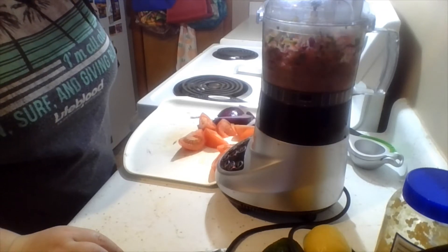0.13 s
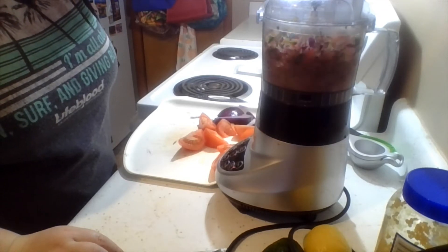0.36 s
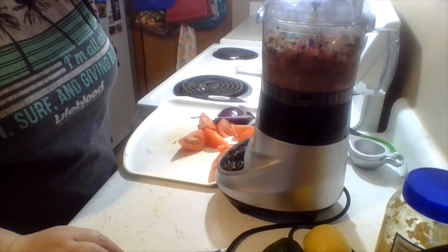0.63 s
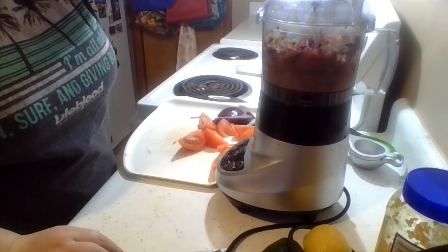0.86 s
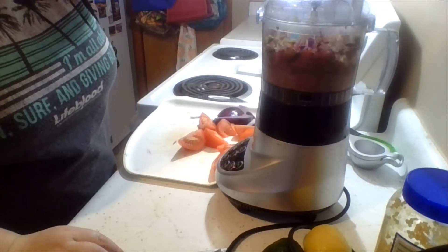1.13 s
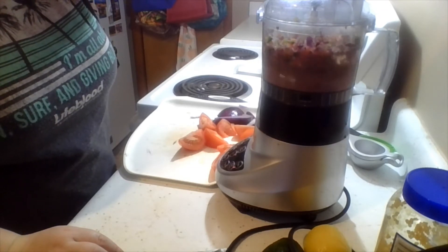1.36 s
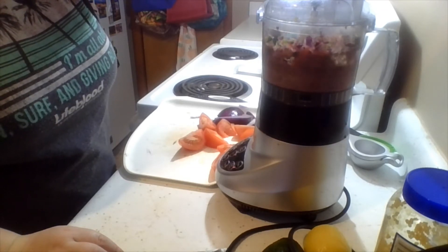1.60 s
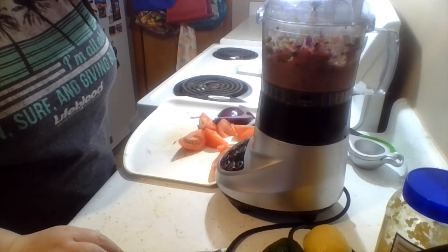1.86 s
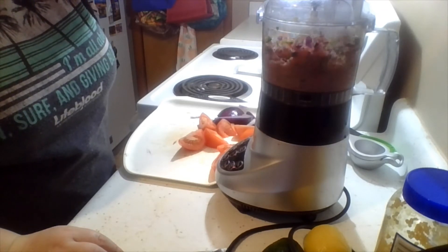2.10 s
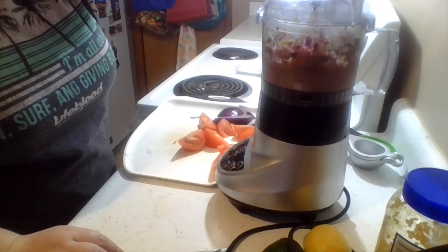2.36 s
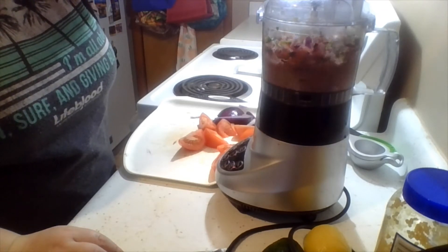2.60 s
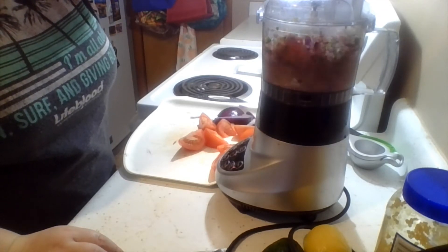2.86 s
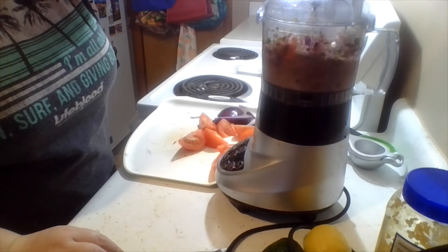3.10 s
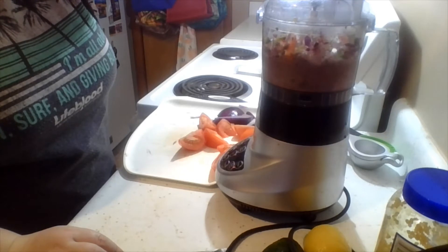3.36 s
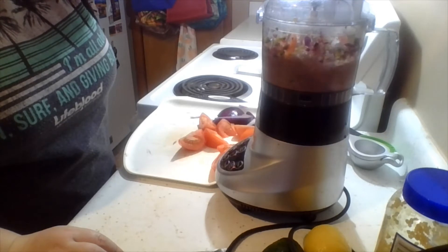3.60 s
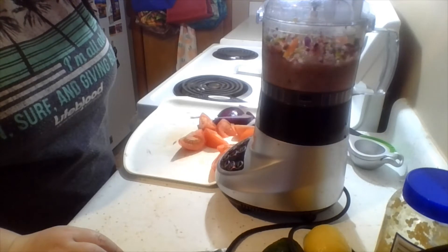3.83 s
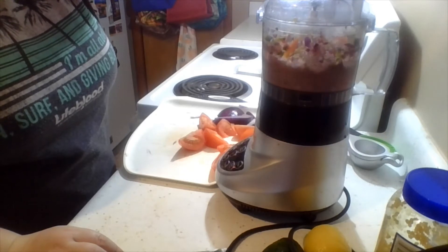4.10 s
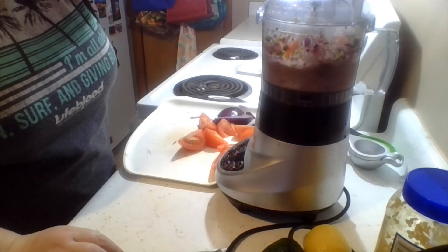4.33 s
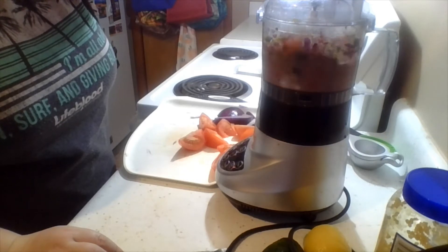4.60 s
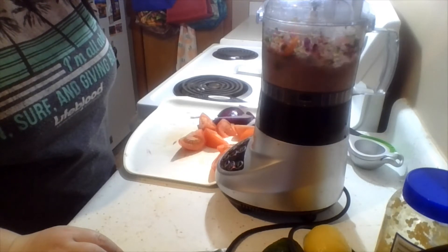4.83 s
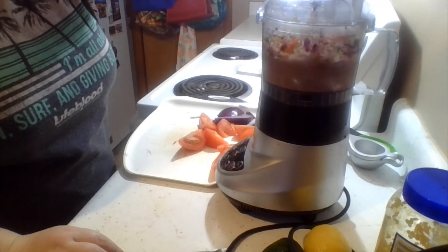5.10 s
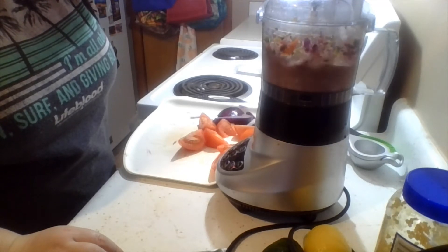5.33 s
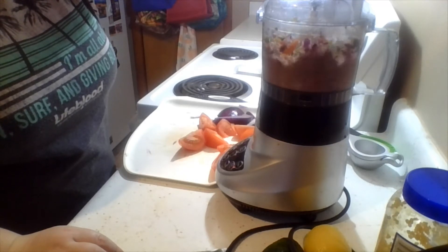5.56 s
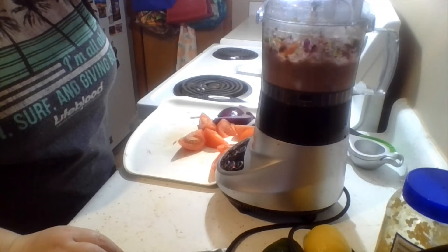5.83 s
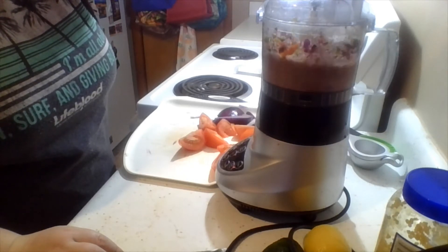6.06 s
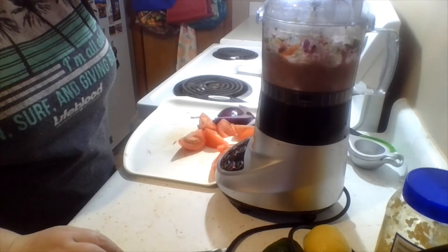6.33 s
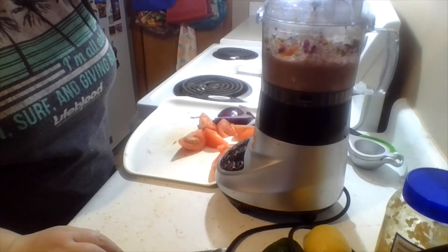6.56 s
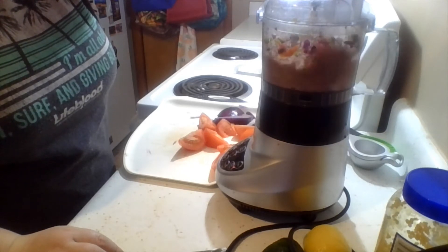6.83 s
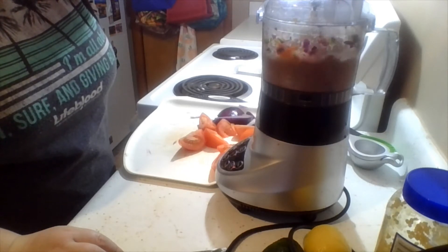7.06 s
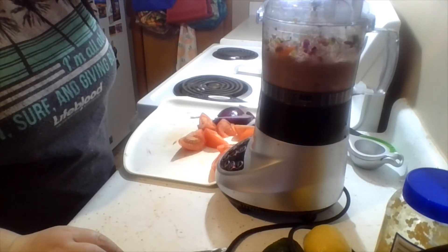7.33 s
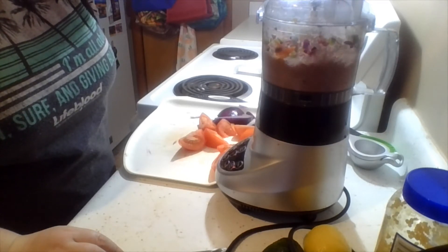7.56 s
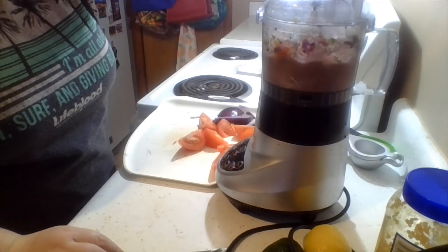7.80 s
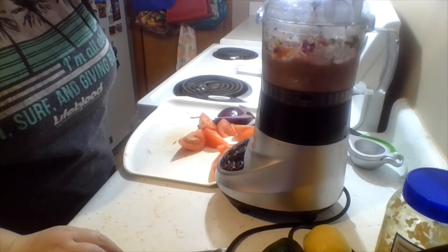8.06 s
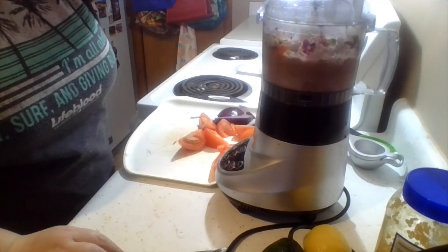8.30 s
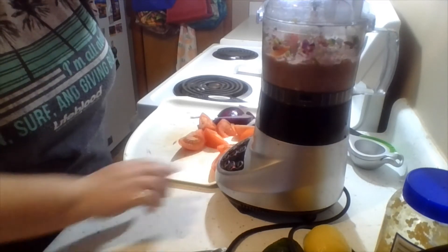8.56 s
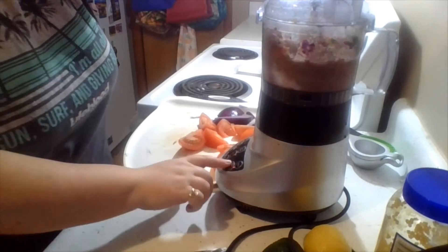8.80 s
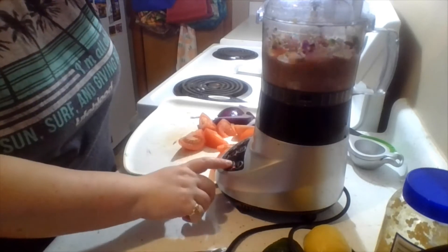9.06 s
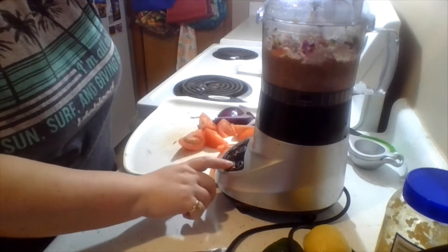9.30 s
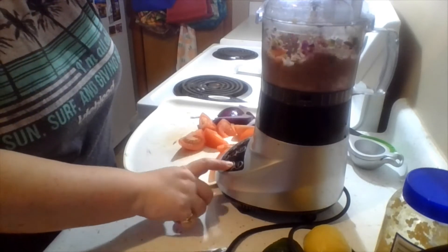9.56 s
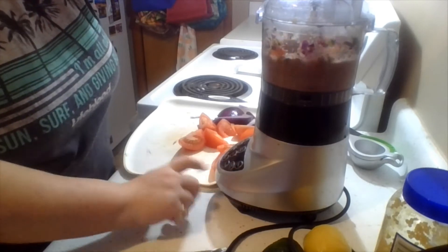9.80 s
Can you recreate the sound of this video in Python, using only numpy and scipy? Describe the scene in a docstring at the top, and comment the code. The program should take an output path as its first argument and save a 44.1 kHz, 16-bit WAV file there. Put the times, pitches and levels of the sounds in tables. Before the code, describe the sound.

A small food processor roars and whines steadily as it chops vegetables, then is switched off and coasts down with a falling, rattling whine.

```python
"""Food processor, running and coasting down

A small food processor chops vegetables on a kitchen counter, heard by one microphone.
A 12-tooth motor pinion drives a 29-tooth gear: a throbbing noise roar, tooth tones, shaft hum,
tooth blows and chopping bursts pass through the resonances of one plastic housing.
Switched off near the end, it coasts down with a falling, rattling whine.
Now and then the sound thins to a few steady tones for an instant."""
import sys
import numpy as np
from scipy import signal
from scipy.fft import rfft, irfft, next_fast_len
from scipy.io import wavfile
from scipy.ndimage import uniform_filter1d, map_coordinates

SR = 44100
rng = np.random.default_rng(int(sys.argv[2]) if len(sys.argv) > 2 else 0)


def voltage_ratio(level):
    """Linear amplitude factor for a level in decibels (scalar or array-like)."""
    return 10 ** (np.asarray(level, float) / 20)


def wrap_up_sound(samples):
    """Save the sound to the file named by the first command line argument, as 16-bit audio."""
    columns = np.atleast_2d(samples).T
    # keep every value between -1 and 1, then stretch to whole-number steps
    tamed = np.clip(columns, -1, 1)
    steps = np.round(tamed * 32767).astype(np.int16)
    wavfile.write(sys.argv[1], SR, steps)


N = 437472
T = np.arange(N) / SR  # seconds
TEETH = 29  # on the driven gear
OFF_S, UNLOAD_S = 8.72, 0.064  # switch-off time; how long the teeth take to lose their load


def walk(rate):
    """Smoothed random process: levels held 1 / rate s and slewed twice, spread near 1."""
    hold = int(SR / rate)
    steps = np.repeat(rng.standard_normal(N // hold + 1), hold)
    return 1.3 * uniform_filter1d(uniform_filter1d(steps, hold), hold)[:N]


def per_turn(turn, rate):
    """Random process locked to rotation: `rate` new values a gear turn, so it slows with the gear."""
    place = turn * rate / (2 * np.pi)
    return map_coordinates(rng.standard_normal(N // 8), [place], order=3)


def curves(rows):
    """Linear interpolation of every column of a table against its first, time."""
    s, *columns = np.transpose(rows)
    return [np.interp(T, s, column) for column in columns]


def shape(x, gain):
    """Linear filtering in the frequency domain by a gain that is a function of frequency."""
    size = next_fast_len(N)
    hz = np.arange(size // 2 + 1) * SR / size + 1  # 1 Hz up, so a logarithm is safe
    return irfft(rfft(x, size) * gain(hz), size)[:N]


def resonance_db(hz, rows):
    """Resonance curves: each row adds a bell in dB about its own frequency."""
    return sum(db / (1 + (2 * (hz - f) / width) ** 2) for f, width, db in rows)


# Gear speed under power, creeping up as the food gets finer: time_s, speed_turns_per_s
POWERED_SPEED = [(0.0, 134.0), (0.7, 133.45), (1.2, 133.45), (1.55, 133.8), (2.03, 133.6), (2.4, 133.9),
                 (3.7, 134.4), (4.1, 134.15), (5.2, 134.0), (6.38, 134.85), (7.1, 134.7), (7.6, 135.3),
                 (8.3, 135.05), (8.72, 135.1)]


def gear_speed():
    """Rotational dynamics: the motor holds the speed, then air drag and dry friction brake it."""
    drag_s = 1.4  # time constant of the air drag
    friction_turns_s = 80  # speed at which the drag would brake as hard as the friction
    powered, = curves(POWERED_SPEED)
    decay = np.exp(-np.maximum(T - OFF_S, 0) / drag_s)
    return (powered + friction_turns_s) * decay - friction_turns_s


# Bass and treble of the roar against its middle: time_s, bass_db, treble_db
ROAR_BALANCE = [(0, 2.3, 1), (9.0, 2.3, .5), (9.15, 1, -2), (9.28, 0, -2), (9.33, -8, -2), (9.55, -11, -6),
                (9.7, -14, -10), (9.82, -13, -17), (9.92, -7, -22)]


def roar(turn):
    """Amplitude-modulated noise of fan, brushes and churning food; its bass and treble die first."""
    throb, throb_twice, bass_throb = 0.09, 0.08, 0.3  # modulation depths
    low_hz, high_hz, flicker_db = 850, 3900, 0.7
    bass_db, treble_db = curves(ROAR_BALANCE)
    gate = 1 + throb * np.cos(turn) + throb_twice * np.cos(2 * turn)
    noise = rng.standard_normal(N) * gate
    low = shape(noise, lambda hz: 1 / (1 + (hz / low_hz) ** 4))
    high = shape(noise, lambda hz: 1 - 1 / (1 + (hz / high_hz) ** 8))
    middle = noise - low - high
    bass = low * (1 + bass_throb * np.cos(turn))
    parts = ((bass, bass_db), (middle, 0), (high, treble_db))
    return sum(part * voltage_ratio(db + flicker_db * walk(18)) for part, db in parts)


# Tones of the loaded gear pair, before the housing; multiple 2.417 is the motor shaft:
# multiple_of_gear_turn, level_db
LOADED_TONES = [(1.417, -27.5), (2.417, -23), (3.417, -33), (4.833, -36), (7.25, -33), (24.417, -31),
                (25, -32), (26, -23), (27, -21), (27.417, -30), (28, -18.5), (29, -20), (30, -19.5),
                (30.417, -31), (31, -20), (31.417, -30), (32, -28), (32.417, -32)]
# How strongly the shaft hums, swelling early, weaker in the middle, strongest before switch-off:
# time_s, gain_db
SHAFT_HUM = [(0, -1), (1, 2), (3, -2), (4.5, -2), (6, -2.5), (7.4, -2.5), (7.8, 2), (8.7, 3)]


def loaded_tones(turn, on):
    """Gear-mesh modulation: uneven teeth spread the whine into side tones one gear turn apart."""
    waver_db, fade_db, hum_waver_db = 1.8, 3, 1.8
    slip_rad = 0.35
    hum_db, = curves(SHAFT_HUM)
    tones = np.zeros(N)
    for multiple, db in LOADED_TONES:
        if multiple > 20:  # the tooth tones come and go
            change_db = waver_db * walk(6) + fade_db * walk(1.4)
        else:
            change_db = hum_waver_db * walk(8) + hum_db
        phase = multiple * turn + slip_rad * walk(12) + 2 * np.pi * rng.random()
        tones += voltage_ratio(db + change_db) * np.cos(phase)
    return np.sqrt(2) * on * tones


# Fundamental of the unloaded whine against the roar, before the housing: time_s, level_db
WHINE_LEVEL = [(8.7, -40), (8.74, -10.5), (9.0, -11.5), (9.12, -6.5), (9.25, -7.5), (9.42, -9),
               (9.54, -10.5), (9.62, -17), (9.7, -19), (9.8, -24), (9.92, -26)]
# Its harmonics, each strongest at one gear speed:
# best_level_db, best_speed_turns_per_s, loss_db_per_octave_of_speed
WHINE_OVERTONES = [(-10.5, 60, .5), (-10, 36, 9), (-17, 26, 8)]


def whine_levels(speed, on):
    """Speed-dependent excitation: load holds the harmonics down, and slow teeth strike softly."""
    loaded_db, slow_turns_s, slow_db = -30, 36, 6  # slow_db is lost per octave below slow_turns_s
    soft_db = slow_db * np.minimum(np.log2(speed / slow_turns_s), 0)
    levels = curves(WHINE_LEVEL)
    for db, best, loss in WHINE_OVERTONES:
        levels.append(db - loss * abs(np.log2(speed / best)) + loaded_db * on + soft_db)
    return levels


def free_whine(turn, levels_db):
    """Backlash rattle: without load the pitch lurches, and partials break up and beat once a turn."""
    throb = 0.45
    phase = TEETH * turn + 2.5 * per_turn(turn, .25)
    whine = np.zeros(N)
    for k, db in enumerate(levels_db):
        level = voltage_ratio(db + 2.2 * per_turn(turn, 3) + 1.2 * walk(40))
        beat = 1 + throb * np.cos(turn + k + per_turn(turn, .4))
        jitter = .95 * per_turn(turn, 5) + .9 * per_turn(turn, 1.6) + .7 * walk(120)
        whine += level * beat * np.cos((k + 1) * phase + (k + 1) ** .35 * jitter)
    return np.sqrt(2) * whine


def chatter(turn, speed):
    """Narrow-band noise of irregular tooth blows round the tooth rate, surging as food catches."""
    level_db, surge_db = -13.5, 1
    spread = 7  # random values a gear turn
    blows = per_turn(turn, spread) * np.cos(TEETH * turn)
    blows += per_turn(turn, spread) * np.sin(TEETH * turn)
    return voltage_ratio(level_db + surge_db * walk(4.1)) * blows * (speed / speed[0]) ** .5


def chopping(on):
    """Random impacts: food knocks blade and bowl in short noise bursts of uneven size."""
    level_db, spread_db = -10, 4
    decay_ms, hits_per_s = 1.5, 250
    hits = (rng.random(N) < hits_per_s / SR) * voltage_ratio(spread_db * rng.standard_normal(N))
    envelope = signal.lfilter([1], [1, -np.exp(-1000 / (decay_ms * SR))], hits)
    bursts = envelope * rng.standard_normal(N)
    return voltage_ratio(level_db) * on * bursts / np.std(bursts)


# Broad colour of the housing, relative: frequency_hz, gain_db
HOUSING_COLOUR = [(24, -61), (45, -53.5), (127, -11.5), (284, -8), (324, -5.5), (430, -7), (809, -7.5),
                  (1280, -2.5), (1520, -6.5), (2990, -2.5), (3890, -2.5), (5630, -6.5), (6560, -4),
                  (7310, -4), (9500, -16.5), (16100, -120)]
# Housing resonances: frequency_hz, width_hz, gain_db
HOUSING_RINGS = [(392, 55, 2), (1005, 42, 3.5), (1135, 85, 4), (1241, 54, 5.5), (1330, 15, 5.5),
                 (1843, 180, 4), (2700, 280, 2.5), (4683, 210, 4), (4970, 490, 4.5), (6500, 600, 1),
                 (7650, 40, -0.5)]
# Narrow dips, perhaps reflections from counter and cupboards: frequency_hz, width_hz, gain_db
NARROW_DIPS = [(2690, 50, -8), (4400, 50, -5), (4735, 40, -6), (4790, 30, -5), (5210, 40, -8),
               (5580, 30, -8), (5700, 40, -8), (5860, 40, -6), (6020, 40, -4), (6260, 60, -7),
               (6860, 30, -9), (7012, 30, -10), (7075, 30, -6), (7138, 30, -11), (7265, 30, -6)]


def housing(hz):
    """Transfer function of the housing: broad colour, resonances and dips add in dB."""
    colour_hz, colour_db = np.transpose(HOUSING_COLOUR)
    db = np.interp(np.log(hz), np.log(colour_hz), colour_db)
    return voltage_ratio(db + resonance_db(hz, HOUSING_RINGS + NARROW_DIPS))


# Bowl modes that ring on after the whine has swept past them: frequency_hz, width_hz, gain_db
BOWL_MODES = [(1210, 9, 7), (1900, 16, 3), (2880, 9, 8)]


def ringing(hz):
    """Modal excitation: loose teeth drive the housing resonances harder and set the bowl ringing."""
    share = 0.4  # part of each housing resonance's gain added again
    boosts = [(f, width, max(db, 0)) for f, width, db in HOUSING_RINGS]
    rings = voltage_ratio(share * resonance_db(hz, boosts) - 1)
    return rings + sum(voltage_ratio(db) / (1 + 2j * (hz - f) / width) for f, width, db in BOWL_MODES)


# Level of the whole machine, rms over a third of a second: time_s, level_db
MACHINE_LEVEL = [(0, -23.5), (3.3, -23.5), (5, -23.5), (8.7, -23), (9.05, -22), (9.15, -21.5), (9.3, -22.5),
                 (9.58, -25), (9.7, -27.5), (9.8, -33), (9.92, -40.5)]


def scene():
    """Superposition: every source shakes the one housing; the sum is set to the machine's level."""
    speed = gear_speed()
    turn = 2 * np.pi * np.cumsum(speed) / SR  # gear angle in radians
    on = np.clip((OFF_S + UNLOAD_S - T) / UNLOAD_S, 0, 1)  # load on the teeth
    drive = roar(turn) + loaded_tones(turn, on)
    drive += shape(free_whine(turn, whine_levels(speed, on)), ringing)
    drive += chatter(turn, speed) + chopping(on)
    body = shape(drive, housing)
    level_db, = curves(MACHINE_LEVEL)
    body = body * voltage_ratio(level_db) / np.sqrt(uniform_filter1d(body ** 2, SR // 3))
    return np.array([body, body])


# Instants when the sound thins to steady tones; length runs between mid-fades, before trims:
# middle_s, length_ms, remaining_db
THINNED = [(0.091, 24, -20.5), (0.22, 21, -17.5), (0.255, 24, -13), (0.327, 25, -18.5), (0.477, 22, -12.5),
           (0.626, 28, -11.5), (0.7, 21, -6), (0.772, 19, -19.5), (1.216, 21, -3.5), (1.245, 18, -14.5),
           (1.383, 27, -5.5), (1.439, 30, -16), (1.478, 36, -15), (1.991, 24, -20.5), (2.206, 34, -14),
           (2.419, 27, -20), (2.46, 27, -9.5), (2.608, 28, -14.5), (3.164, 28, -19), (3.238, 23, -8.5),
           (3.357, 31, -14.5), (3.523, 27, -16.5), (3.633, 23, -24), (3.85, 45, -29.5), (4.05, 42, -13.5),
           (4.097, 24, -17.5), (4.125, 39, -17), (4.378, 32, -16.5), (4.658, 19, -12), (4.785, 24, -15),
           (4.819, 15, -12), (4.976, 38, -18), (5.084, 21, -18), (5.461, 20, -7.5), (5.488, 14, -22),
           (5.533, 32, -19), (5.682, 23, -18), (5.78, 29, -14), (6.237, 28, -8.5), (6.313, 27, -6),
           (6.375, 24, -10), (6.654, 26, -12), (6.708, 38, -17), (6.757, 25, -10), (6.886, 43, -28.5),
           (7.014, 39, -30), (7.344, 24, -12), (7.656, 27, -10), (7.827, 27, -10), (7.943, 37, -11.5),
           (8.189, 47, -42), (8.809, 22, -11.5), (8.923, 28, -18.5), (9.314, 50, -24.5), (9.393, 28, -22),
           (9.61, 28, -19.5)]


def thin(x):
    """Spectral peak picking: strong partials go on as steady tones while each band dips in its own time."""
    tones_per_ms, apart_hz, gain_db = 0.3, 70, -1
    fade_ms, ragged_ms = 7, 8  # ragged_ms: most that a band starts late or ends early
    edges_hz = np.linspace(200, 6250, 7)  # deep bass and top stay whole
    size = 8192  # of the transform
    bands = [shape(x, lambda hz: 1. * (hz > lo) * (hz <= hi)) for lo, hi in zip(edges_hz, edges_hz[1:])]
    body = sum(bands)
    whole, tones = np.ones((len(bands), N)), np.zeros(N)
    trims_ms = ragged_ms * rng.random((len(THINNED), 2, len(bands), 1))
    for (s, ms, left_db), (late, early) in zip(THINNED, trims_ms):
        half = int((ms + fade_ms) * SR / 2000)
        span = np.arange(-half, min(half, N - int(s * SR)))
        at = int(s * SR) + span
        # the strongest spectral peaks, held as steady sinusoids
        lines = rfft(body[at] * np.hanning(len(at)), size)
        peaks = signal.find_peaks(abs(lines), distance=apart_hz * size / SR)[0]
        peaks = peaks[np.argsort(abs(lines[peaks]))[-int(4 + tones_per_ms * ms):]]
        steady = np.real(lines[peaks] @ np.exp(2j * np.pi * np.outer(peaks, span + half) / size))
        # crossfade, band by band
        inside_ms = np.minimum((half + span) * 1000 / SR - late, (half - span) * 1000 / SR - early)
        share = np.clip(inside_ms / fade_ms, 0, 1)
        whole[:, at] *= np.maximum(np.cos(share * np.pi / 2), voltage_ratio(left_db))
        # the tones make up for most of the power taken away
        lost = np.sqrt(1 - voltage_ratio(2 * min(left_db, -1)))
        level = voltage_ratio(gain_db) * lost * np.std(body[at]) / np.std(steady)
        tones[at] += np.sin(share.mean(axis=0) * np.pi / 2) * steady * level
    return x - body + np.sum(whole * bands, axis=0) + tones


def top_cut(x):
    """Nothing passes above the cut-off."""
    return signal.sosfilt(signal.butter(12, 7460, fs=SR, output="sos"), x)


def record(dry):
    """High-pass filtering at 50 Hz: one channel without deep bass, copied to both sides."""
    high_pass = signal.butter(2, 50, "high", fs=SR, output="sos")
    mono = signal.sosfilt(high_pass, thin(dry[0]))
    return top_cut(np.array([mono, mono]))


dry = scene()
out = record(dry)
wrap_up_sound(out)
```